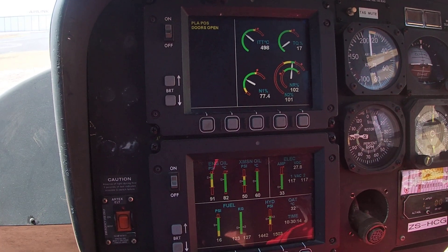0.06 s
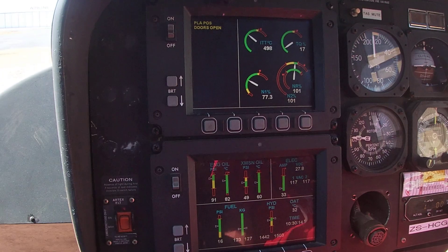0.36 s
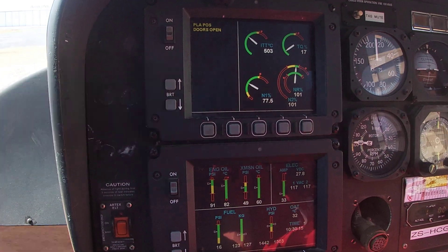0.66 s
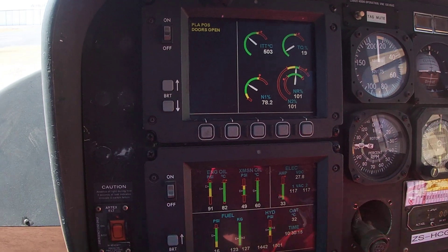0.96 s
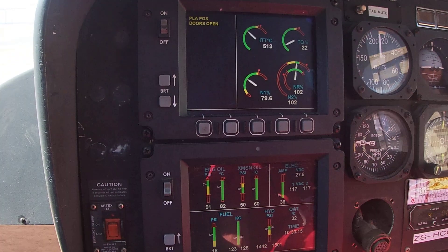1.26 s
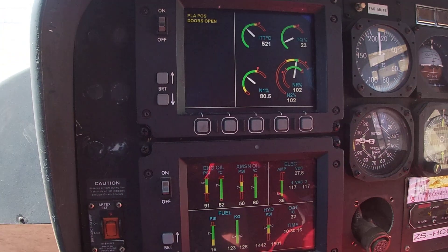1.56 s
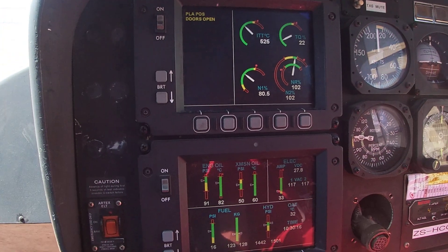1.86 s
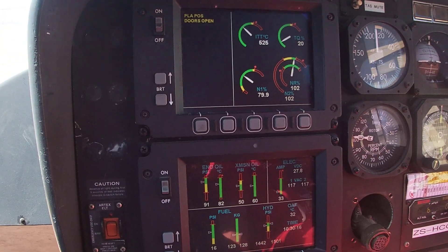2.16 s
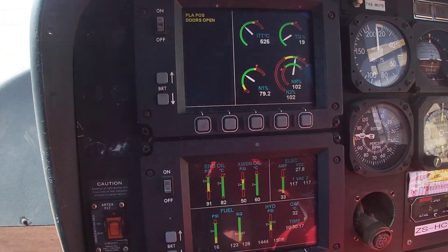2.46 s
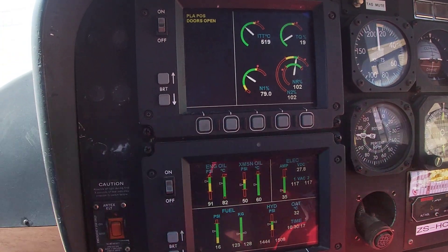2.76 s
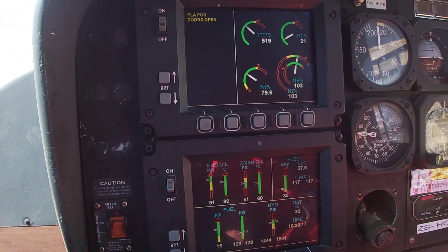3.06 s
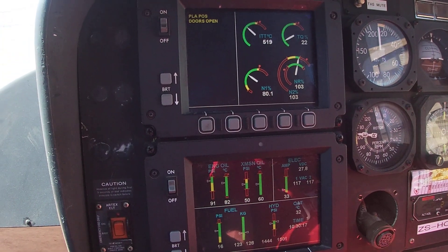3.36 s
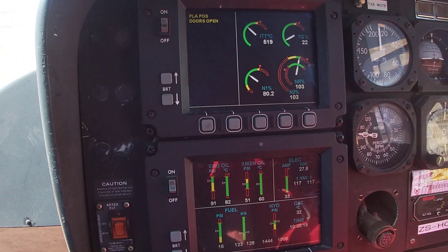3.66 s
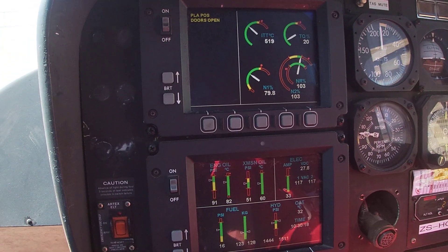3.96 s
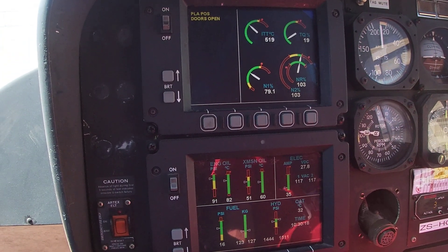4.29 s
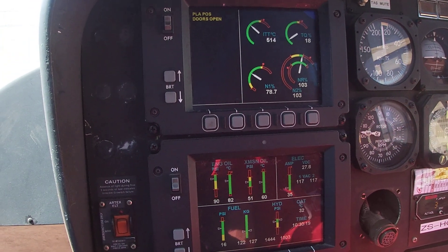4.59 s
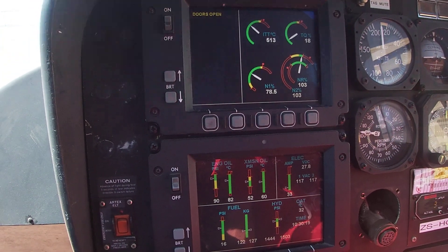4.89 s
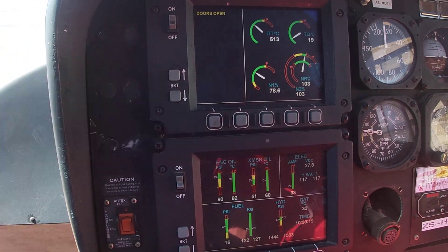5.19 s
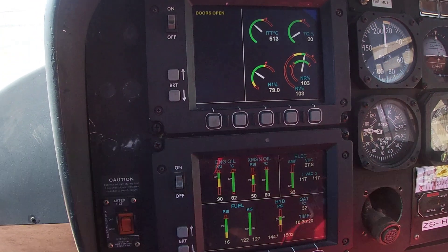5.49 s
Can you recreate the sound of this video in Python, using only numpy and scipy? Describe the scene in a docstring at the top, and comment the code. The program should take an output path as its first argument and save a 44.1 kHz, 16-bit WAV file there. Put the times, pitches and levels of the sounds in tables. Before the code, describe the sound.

A turbine helicopter runs steadily on the ground, heard from inside the cockpit. The main rotor throbs deeply beneath a low drone and a dense roar of air and engine that makes the cabin boom. A gearbox whine grows a little louder early on, flutters briefly, then settles back. High above it, a faint, thin turbine whistle drifts slowly up and down.

```python
"""Four main rotor blades throb over the cockpit of a turbine helicopter on the ground, near flight speed.
Geared to them, the tail rotor and a drive shaft drone and the gearbox whines, fluttering at a torque peak.
The gas generator hunts up and down under its governor, its compressor giving a thin whistle.
Underneath lies a bed of rotor wash and turbine roar that sets the cabin booming and its panels humming."""
import sys
import numpy as np
from scipy import signal
from scipy.fft import rfft, irfft
from scipy.io import wavfile
from scipy.ndimage import uniform_filter1d, minimum_filter1d

SR = 44100
rng = np.random.default_rng(int(sys.argv[2]) if len(sys.argv) > 2 else 0)


def unload_wav(signal):
    """Save mono or channel-first audio to the path in sys.argv[1] as 16-bit WAV at rate SR, clipped to [-1, 1]."""
    wavfile.write(
        sys.argv[1],
        SR,
        np.round(np.clip(np.atleast_2d(signal).T, -1, 1) * 32767).astype(np.int16),
    )


N = 243873
TIME = np.arange(N) / SR

# noise beds of rotor wash, cabin boom, panel hum and turbine roar: (frequency [Hz], density [dB per Hz])
WASH_SPECTRUM = [(8, -63), (30, -45.5), (60, -47), (110, -55.5), (170, -44.5), (215, -49.5), (255, -59.5),
                 (330, -58), (390, -55), (440, -55), (560, -62), (750, -69.5), (1200, -79.5), (5000, -160)]
BOOM_SPECTRUM = [(120, -97), (245, -54), (280, -53), (315, -48.5), (350, -53), (420, -71.5), (700, -100),
                 (2000, -160)]
PANEL_SPECTRUM = [(600, -100), (880, -71), (1050, -64), (1250, -70.5), (1600, -100), (3000, -160)]
ROAR_SPECTRUM = [(200, -90), (750, -66), (1100, -70.5), (1450, -73), (2000, -75.5), (2330, -81),
                 (2900, -80.5), (4000, -87.5), (5600, -90.5), (6500, -104.5), (7600, -108), (10400, -103.5),
                 (13200, -109.5), (15700, -123)]
# cabin and panel resonances: (frequency [Hz], width [Hz], lift [dB])
CABIN_RESONANCES = [(131.4, 8.4, -5.5), (184, 17, 3.5), (301.7, 43, 4.5), (425.7, 61, 5.5), (497, 16, 0),
                    (581, 44, 5), (618, 6.8, 4.5), (687, 11, 4), (990, 170, 2), (1254, 28, 2.5),
                    (1640, 48, 4.5), (2160, 70, 3.5), (3670, 77, 0.5)]
# swell of the air stirred by the rotor: (time [s], level [dB])
GUST_LEVELS = [(.1, -0.5), (.8, 0), (1.32, -0.9), (1.7, 1.4), (2.35, .2), (2.85, 0.6), (3.3, -0.56),
               (4.1, 1), (4.8, -0.9), (5.25, 0.1)]
# a cabin panel buzzes up now and then: (peak time [s], half length [s], lift [dB])
PANEL_BUZZES = [(2.1, .12, 3), (2.46, .09, 3.5), (5.2, .14, 3)]
# turning points of the gas generator's speed as the governor hunts: (time [s], whistle pitch [Hz])
WHISTLE_PITCH = [(.38, 7840), (1.55, 8228), (2.5, 7995), (3.47, 8162), (4.77, 7950), (5.53, 8035)]
# turning points of the heavy drive train, which follows late: (time [s], gear mesh pitch [Hz])
MESH_PITCH = [(0, 1847), (.68, 1842.5), (1.85, 1866.5), (2.5, 1865), (3.82, 1878), (5.15, 1870.5)]
# pumps, fan and lesser gears: (pitch at mean speed [Hz], level [dB])
ACCESSORY_TONES = [(180, -33.5), (232.8, -36.5), (258.9, -39), (333.9, -40.5), (645.5, -46), (1544, -65.5),
                   (1670.8, -61.5), (2489.6, -65.5), (2522.4, -63), (3730, -72.5), (4160, -73.5)]
# envelope of the gearbox whine: (time [s], level [dB])
WHINE_LEVELS = [(.15, -40), (.72, -35), (1.5, -35), (1.95, -41.5), (2.85, -44), (3.2, -40.5), (4.2, -42),
                (4.75, -49.5), (5.1, -43.5)]
# harmonics of the drive shaft's turn and of the tail blade pass: (multiple, relative level [dB])
SHAFT_HARMONICS = [(1, 0.5), (2, -16.5), (3, -14), (5, -21)]
TAIL_HARMONICS = [(1, -0.5), (2, -0.5), (3, -18), (4, -11.5), (6, -21.5), (8, -42.5), (9, -30.5),
                  (10, -32.5)]
# weaker harmonics of the main rotor: (multiple of the turn rate, level [dB])
ROTOR_HARMONICS = [(7, -45.5), (12, -35), (20, -31.5), (24, -35), (25, -45), (28, -31.5), (32, -38),
                   (36, -38)]
# envelope of the main rotor's throb: (time [s], blade-pass level [dB], octave level [dB])
THROB_LEVELS = [(0, -20, -15.5), (.42, -24.5, -17.5), (.9, -16.5, -19.5), (1.5, -21, -16),
                (1.72, -19.5, -26.5), (2.15, -19.5, -21.5), (2.5, -15, -26), (2.95, -16.5, -23),
                (3.48, -20.5, -16), (4.05, -18, -30), (4.3, -15, -20), (4.95, -17, -22.5), (5.25, -24, -17)]

BLADES = 4
# gear mesh cycles per main rotor turn, per tail blade pass and per drive shaft turn
MAIN_RATIO, TAIL_RATIO, SHAFT_RATIO = 284.95, 26.214, 18.222
FLIGHT_PERCENT = .15  # flight speed lies this far above the mean speed


def gain_of(db):
    return 10 ** (np.asarray(db) / 20)


def unit_rms(x):
    return x / np.sqrt(np.mean(x ** 2) + 1e-20)


def envelopes(rows):
    """One envelope per level column, in straight ramps between the times."""
    times, *columns = np.transpose(rows)
    return [np.interp(TIME, times, column) for column in columns]


def glide(rows):
    """A pitch that eases from each turning point to the next."""
    times, hz = np.transpose(rows)
    points = np.arange(len(times))
    step = np.interp(TIME, times, points)
    eased = np.floor(step) + np.sin(np.pi / 2 * (step % 1)) ** 2
    return np.interp(eased, points, hz)


def percent_fast(speed):
    """How far a speed lies above its mean, in percent."""
    return 100 * (speed / speed.mean() - 1)


def wander(rate_hz):
    """Smooth random modulation of unit rms, rolled off above the rate."""
    count, span_s = 16384, 2 * TIME[-1]
    hz = np.fft.rfftfreq(count, span_s / count)
    slow = irfft(rfft(rng.standard_normal(count)) * np.exp(-(hz / rate_hz) ** 2))
    return unit_rms(np.interp(TIME, np.linspace(0, span_s, count), slow))


def tone(cycles, rms_db, drift_rad):
    """A sine that follows a running count of cycles, pushed early or late by the drift."""
    return np.sqrt(2) * gain_of(rms_db) * np.sin(2 * np.pi * (cycles + rng.random()) + drift_rad)


def cabin_noise(spectrum, patchy_db, trim_db, frame=1024):
    """Turbulence with drifting patches of strength, coloured by the cabin's resonances."""
    hz = np.fft.rfftfreq(N, 1 / SR)
    corner_hz, corner_db = np.transpose(spectrum)
    colour_db = np.interp(np.log(hz + 1), np.log(corner_hz + 1), corner_db) + trim_db
    for centre, width, lift in CABIN_RESONANCES:
        colour_db += lift / (1 + (2 * (hz - centre) / width) ** 4)
    grains = signal.stft(rng.standard_normal(N), nperseg=frame)[2]
    patches = uniform_filter1d(rng.standard_normal(grains.shape), size=9, axis=0)  # smear in frequency
    patches = unit_rms(uniform_filter1d(patches, size=8, axis=1))  # and in time
    air = unit_rms(signal.istft(grains * gain_of(patchy_db * patches), nperseg=frame)[1][:N])
    return irfft(rfft(air) * gain_of(colour_db), N) * np.sqrt(SR / 2)


def swell(speed_percent, db_per_percent, gust_share, waver_db):
    """Gain of a noise bed: it tracks rotor speed up to flight speed, rides the gusts and wavers."""
    gust_db, = envelopes(GUST_LEVELS)
    speed_db = db_per_percent * np.minimum(speed_percent, FLIGHT_PERCENT)
    return gain_of(speed_db + gust_share * gust_db + waver_db * wander(2.0))


def panel_buzz():
    """Gain of the humming panels: each buzz swells and fades."""
    return gain_of(sum(db * np.exp(-((TIME - peak) / half) ** 2) for peak, half, db in PANEL_BUZZES))


def airflow(blade_passes, speed_percent, low_chop=.042, high_chop=.074):
    """Rotor wash and exhaust roar set the cabin booming and its panels humming; each blade pulses them."""
    pulse = np.cos(2 * np.pi * blade_passes + .5 * wander(1.4))
    wash = cabin_noise(WASH_SPECTRUM, patchy_db=0, trim_db=.36)
    wash *= swell(speed_percent, db_per_percent=-.7, gust_share=.93, waver_db=.77)
    boom = cabin_noise(BOOM_SPECTRUM, patchy_db=.56, trim_db=-.2)
    boom *= swell(speed_percent, db_per_percent=3.8, gust_share=.7, waver_db=.5)
    panel = cabin_noise(PANEL_SPECTRUM, patchy_db=.7, trim_db=-.4) * panel_buzz()
    panel *= swell(speed_percent, db_per_percent=1.3, gust_share=.8, waver_db=.5)
    roar = cabin_noise(ROAR_SPECTRUM, patchy_db=.17, trim_db=.71)
    roar *= swell(speed_percent, db_per_percent=.3, gust_share=.65, waver_db=-.07)
    return (wash + boom) * (1 + low_chop * pulse) + (panel + roar) * (1 + high_chop * pulse)


def turbine_whistle(hz, base_db=-80, db_per_percent=1.0, crest_db=8, full_crest_percent=1.2,
                    steady_hz_per_s=110, flicker_db=2.7):
    """Compressor blades whistle: fuzzy while the speed changes, clearer and louder atop each surge."""
    speed_percent = percent_fast(hz)
    steady = np.exp(-(np.gradient(hz) * SR / steady_hz_per_s) ** 2)
    crest = steady * np.clip(speed_percent / full_crest_percent, 0, 1)
    level_db = base_db + db_per_percent * speed_percent + crest_db * crest + flicker_db * wander(15)
    blur_rad = .6 + .7 * (1 - steady)
    return tone(np.cumsum(hz) / SR, level_db, blur_rad * wander(40))


def accessories(mesh_cycles, drift_rad=.55):
    """Pumps, fan and lesser gears sing faintly, their pitch tied to the drive train."""
    geared_time = mesh_cycles / mesh_cycles[-1] * TIME[-1]  # runs fast when the gears do
    return sum(tone(hz * geared_time, db, drift_rad * wander(3.9)) for hz, db in ACCESSORY_TONES)


def mesh_flutter(rotor_turns, torque_peak_s=1.43, rise_s=.04, fade_s=.25, rest_rad=.14, burst_rad=.9):
    """Blade loads shake the gear mesh's phase: lightly at rest, hard just after the torque peak."""
    since = np.maximum(TIME - torque_peak_s, 0)
    burst = np.minimum(since / rise_s, 1) * np.exp(-(since / fade_s) ** 2)
    return (rest_rad + burst_rad * burst) * np.sin(2 * np.pi * BLADES * rotor_turns + wander(8.7))


def gearbox_whine(mesh_cycles, rotor_turns, octave_db=-27, roughness=.21, waver_db=.8, per_turn_db=1.0):
    """Meshing teeth sing a rough tone and its octave, swelling once per rotor turn."""
    envelope_db, = envelopes(WHINE_LEVELS)
    flutter = mesh_flutter(rotor_turns)
    unsteady = gain_of(np.median(envelope_db) - envelope_db) ** .7  # the louder, the steadier
    swell_db = per_turn_db * np.sin(2 * np.pi * rotor_turns + .5 * wander(2.0)) + waver_db * wander(25)
    level_db = envelope_db + unsteady * swell_db - 4 * flutter ** 2  # dips at each swing
    whine = tone(mesh_cycles, level_db, flutter + roughness * wander(50))
    whine *= 1 + roughness * unsteady * wander(63)
    return whine + tone(2 * mesh_cycles, level_db + octave_db, 2 * flutter)


def drone(cycles, base_db, harmonics, jitter_rad, waver_db, gust_share):
    """A harmonic stack on one shaft, louder as gusts load it; higher harmonics jitter more in phase."""
    gust_db, = envelopes(GUST_LEVELS)
    level_db = base_db + gust_share * gust_db + waver_db * wander(1.3)
    return sum(tone(k * cycles, level_db + db, jitter_rad * k * wander(2.4)) for k, db in harmonics)


def drive_shaft(turns):
    """The spinning shaft hums unevenly at its turn rate."""
    return drone(turns, -24, SHAFT_HARMONICS, jitter_rad=.19, waver_db=1.86, gust_share=.81)


def tail_rotor(blade_passes, speed_percent, base_db=-21.5, db_per_percent=-.04):
    """The tail blades pass fast enough to merge into a low drone."""
    level_db = base_db + db_per_percent * speed_percent
    return drone(blade_passes, level_db, TAIL_HARMONICS, jitter_rad=.061, waver_db=.83, gust_share=1.3)


def main_rotor(turns, drift_rad=.34, drift_hz=.8, harmonic_drift_rad=.6):
    """Blade passes press on the cabin in a deep throb; recirculating air shifts their timing."""
    throb_db, octave_db = envelopes(THROB_LEVELS)
    throb = tone(BLADES * turns, throb_db, drift_rad * wander(drift_hz))
    octave = tone(2 * BLADES * turns, octave_db, 2 * drift_rad * wander(drift_hz))
    harmonics = sum(tone(k * turns, db, harmonic_drift_rad * wander(4.0)) for k, db in ROTOR_HARMONICS)
    return throb + octave + harmonics


def scene():
    """Mono mix: one drive train clocks every rotor and shaft, with the turbine whistling above."""
    mesh_hz = glide(MESH_PITCH)
    mesh_cycles = np.cumsum(mesh_hz) / SR
    speed_percent = percent_fast(mesh_hz)
    rotor_turns = mesh_cycles / MAIN_RATIO
    tail = tail_rotor(mesh_cycles / TAIL_RATIO, speed_percent)
    shaft = drive_shaft(mesh_cycles / SHAFT_RATIO)
    throb = main_rotor(rotor_turns)
    gears = gearbox_whine(mesh_cycles, rotor_turns) + accessories(mesh_cycles)
    whistle = turbine_whistle(glide(WHISTLE_PITCH))
    air = airflow(BLADES * rotor_turns, speed_percent)
    return (throb + tail + shaft + gears + whistle + air)[None]


def limiter(x, threshold_db=-5.5, slope=.55, recovery_db_per_s=40, window=300):
    """Ducks just ahead of each peak over the threshold, then recovers."""
    over_db = np.maximum(20 * np.log10(abs(x).max(0) + 1e-9) - threshold_db, 0)
    held_db = -minimum_filter1d(-slope * over_db, window)
    recovery_db = recovery_db_per_s * TIME
    duck_db = np.maximum.accumulate(held_db + recovery_db) - recovery_db
    return x / gain_of(uniform_filter1d(duck_db, window))


def record(dry, input_db=-.19, cutoff_hz=15750):
    """Master chain: peak limiter, tiny fades at both ends and a steep low-pass."""
    limited = limiter(dry * gain_of(input_db))
    fades = signal.windows.tukey(N, .001)
    lowpass = signal.firwin(511, cutoff_hz, window=("kaiser", 9), fs=SR)
    return signal.oaconvolve(limited * fades, lowpass[None], "same")


dry = scene()
out = record(dry)
unload_wav(out)
```